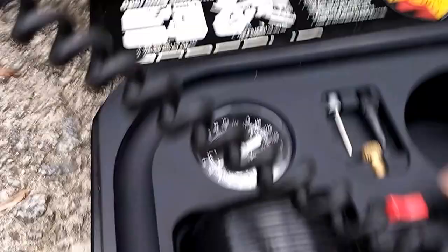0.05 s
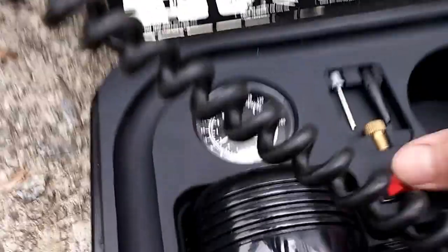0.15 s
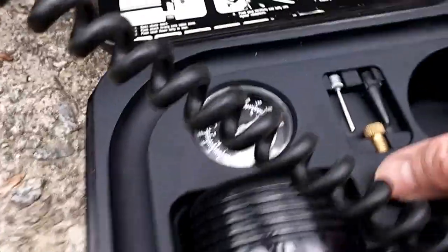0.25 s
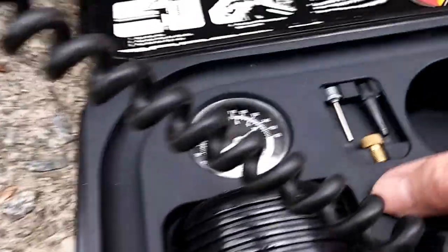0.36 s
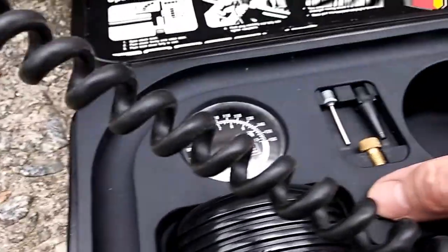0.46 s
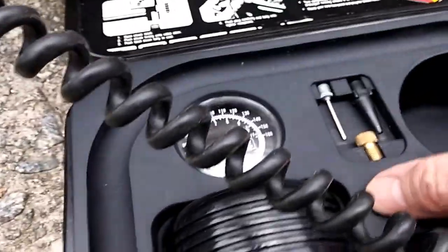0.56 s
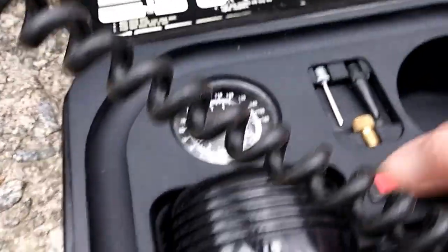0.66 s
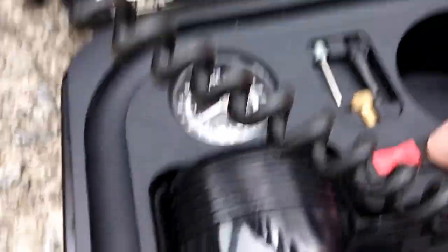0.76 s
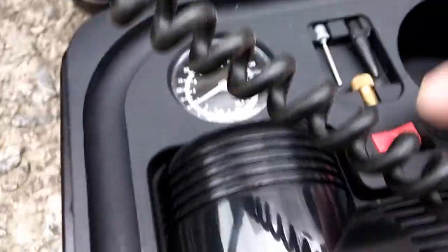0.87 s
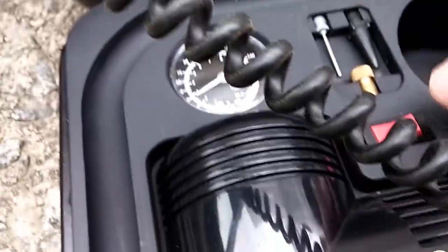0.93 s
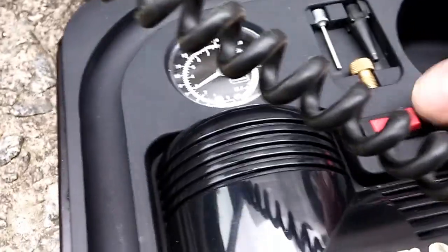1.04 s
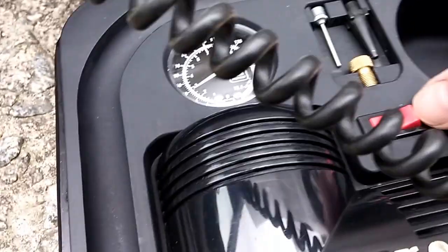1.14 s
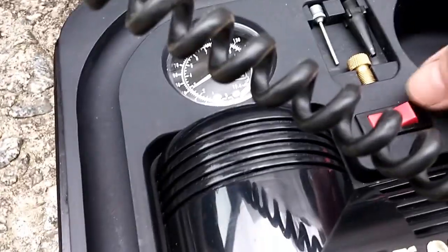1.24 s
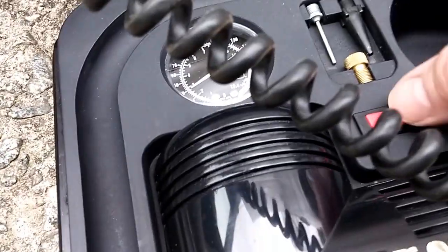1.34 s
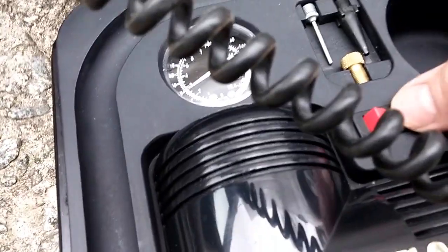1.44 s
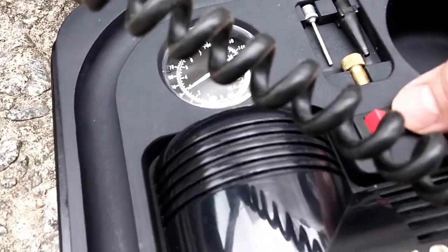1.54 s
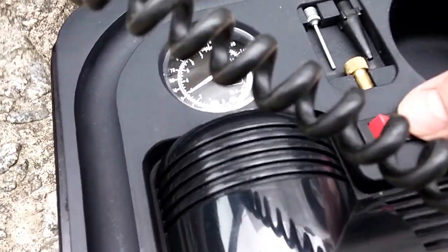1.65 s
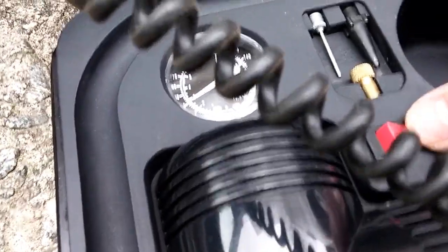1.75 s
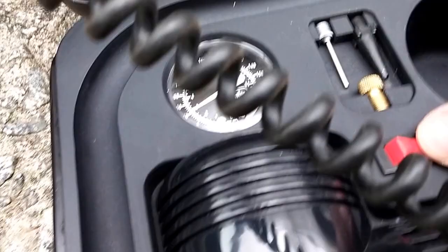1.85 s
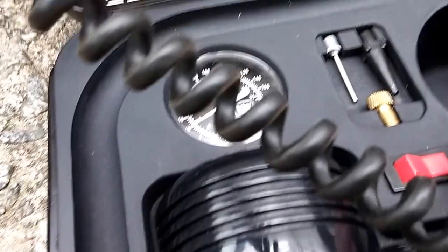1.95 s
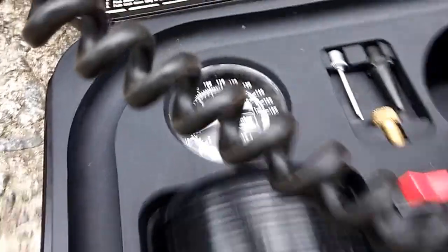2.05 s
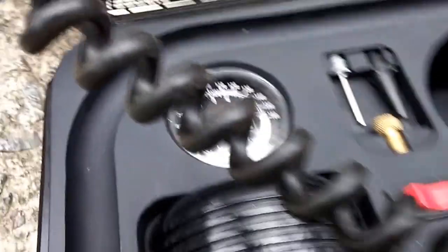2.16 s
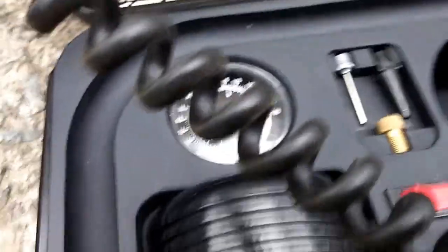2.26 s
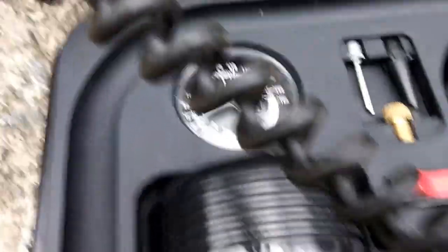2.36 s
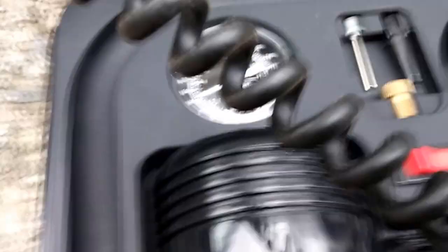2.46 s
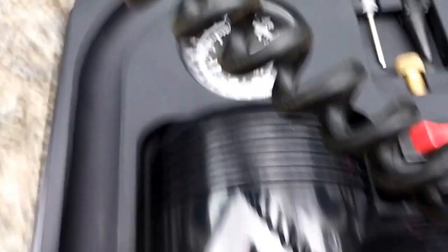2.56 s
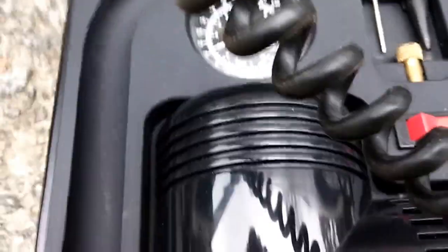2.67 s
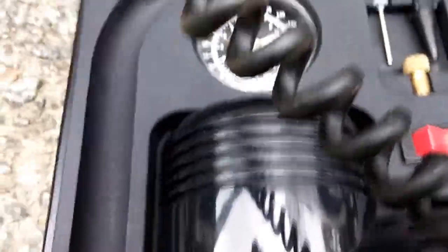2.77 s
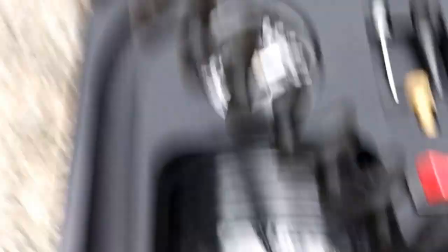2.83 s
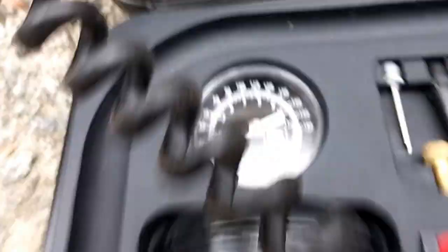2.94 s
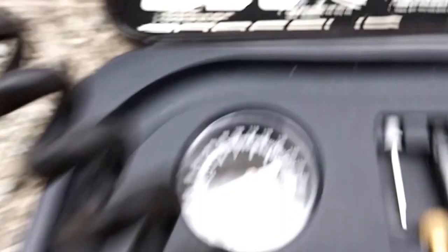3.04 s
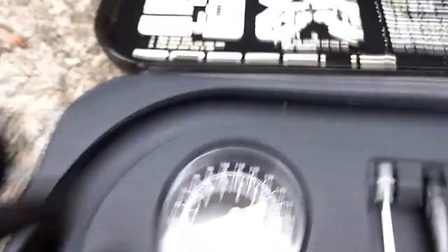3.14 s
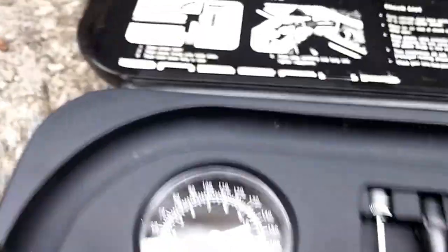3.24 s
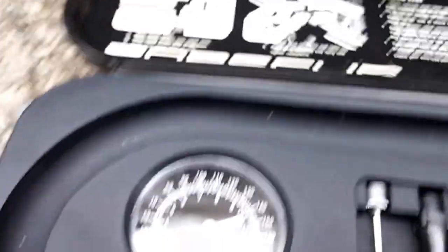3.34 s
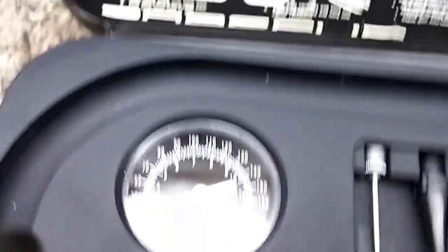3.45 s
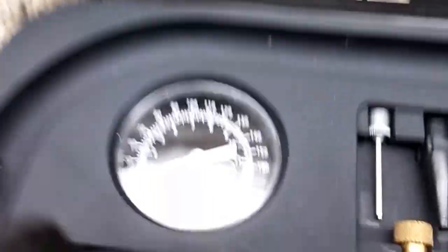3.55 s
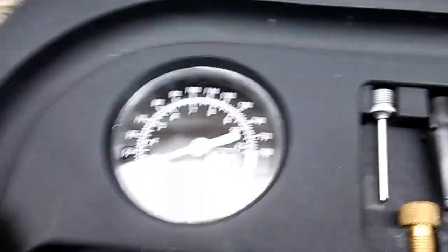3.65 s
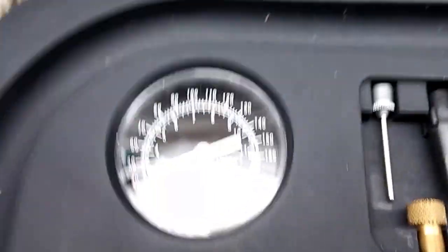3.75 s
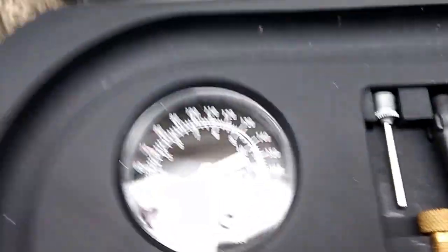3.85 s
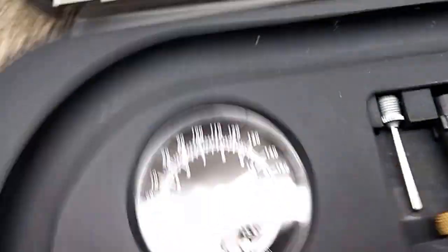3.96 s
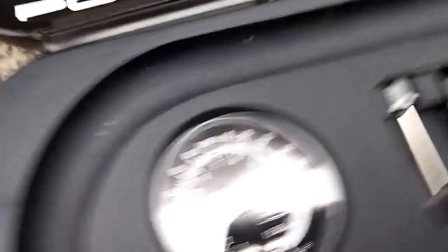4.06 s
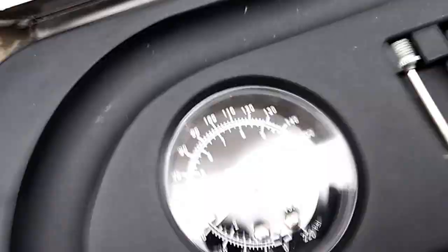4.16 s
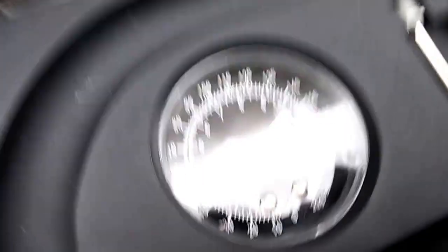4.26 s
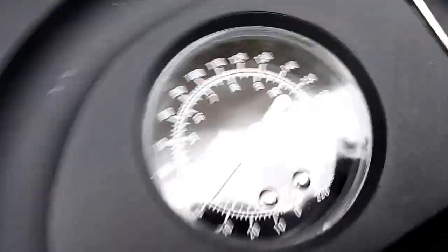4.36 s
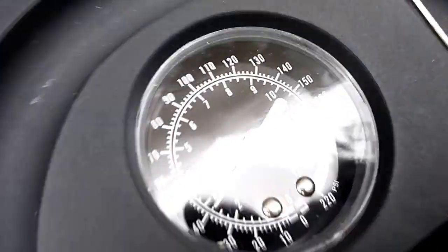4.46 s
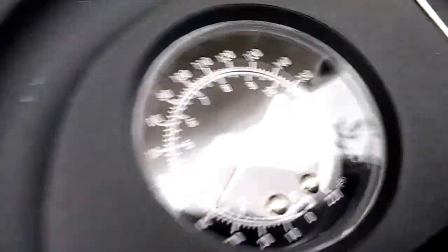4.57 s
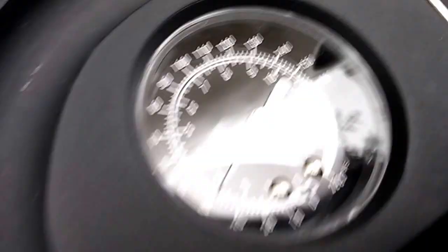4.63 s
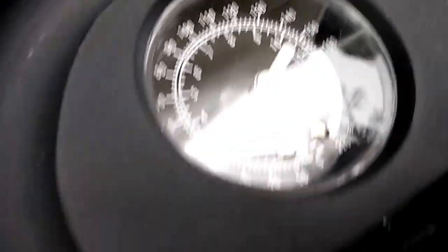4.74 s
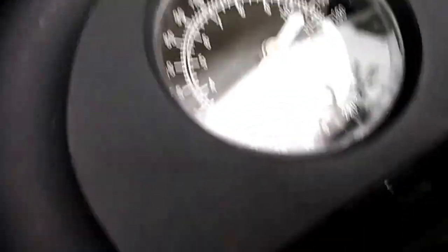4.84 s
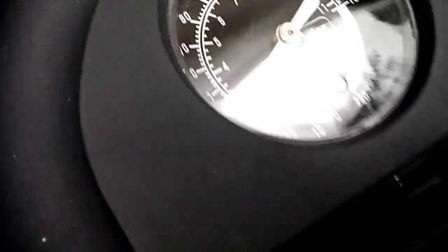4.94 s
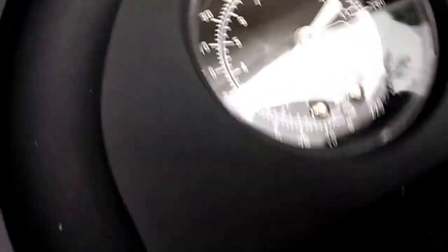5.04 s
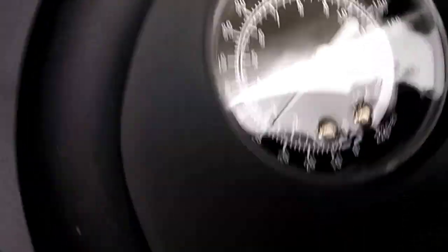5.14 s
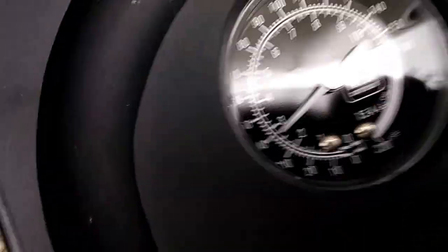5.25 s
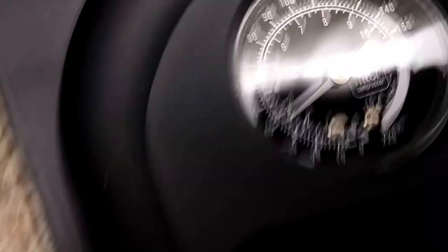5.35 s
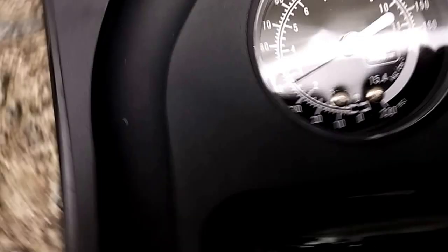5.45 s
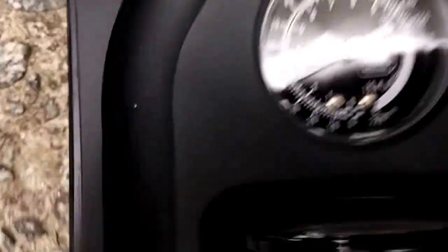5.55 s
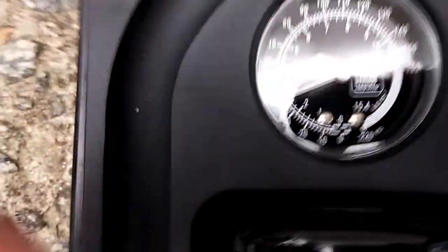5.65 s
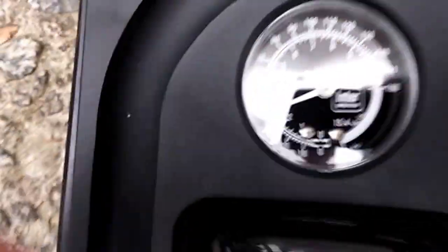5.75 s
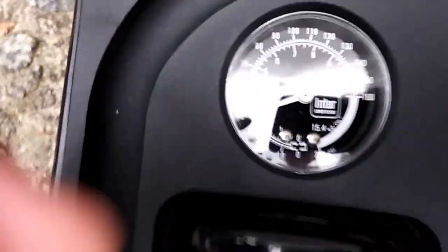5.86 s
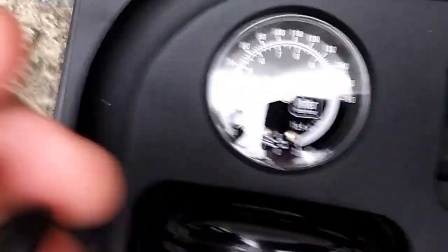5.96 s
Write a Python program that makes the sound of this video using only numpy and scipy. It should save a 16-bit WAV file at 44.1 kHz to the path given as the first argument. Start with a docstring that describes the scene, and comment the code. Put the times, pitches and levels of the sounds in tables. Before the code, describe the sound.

Plastic clicks and knocks on a small case, then a switch snaps and a piston air compressor bursts into a steady buzzing drone.

```python
"""A hand brushes and knocks the plastic case and hose of a small air compressor, then snaps its rocker switch.
The piston motor spins up at once and sags as pressure builds: each crank turn drones, rattles the case,
spits air through the outlet valve and pings the inlet reed, while the motor housing whines.
It stands on the ground outdoors, close to a hand-held camera's stereo microphones, over a faint background.
Random patterns tied to the crank angle, and noise, excite resonances and spectra; one crank drives the machine."""
import sys
import numpy as np
from scipy import signal
from scipy.fft import rfft, irfft, next_fast_len
from scipy.io import wavfile
from scipy.ndimage import uniform_filter1d, map_coordinates

SR = 44100
rng = np.random.default_rng(int(sys.argv[2]) if len(sys.argv) > 2 else 0)


def generate_wav(signal):
    """Clip the signal to [-1, 1] and save it as 16-bit WAV at the path in sys.argv[1]."""
    frames = np.transpose(np.atleast_2d(signal))
    scaled = np.clip(frames, -1, 1) * 32767
    pcm = np.round(scaled).astype(np.int16)
    wavfile.write(sys.argv[1], SR, pcm)


N = 264600

# Motor start and sag. Each row: time in seconds, speed in crank turns per second.
CRANK_SPEED = [(1.47, 0), (1.55, 31.22), (1.7, 34.051), (1.8, 33.814), (2, 33.005), (2.3, 32.252),
               (2.8, 31.693), (3.4, 31.381), (4, 31.189), (4.6, 31.074), (5.3, 30.906), (6, 30.598)]
# The throb grows as the camera comes closer. Each row: time in seconds, relative throb level in dB.
CAMERA_CLOSENESS = [(1.6, -27), (2.14, -25.5), (2.38, -26), (3.38, -21), (4.74, -17), (5.96, -20.5),
                    (6.0, -20.5)]
# Levels as the camera drifts aside. Each: level at the start in dB before closeness, loss in dB per second.
DRONE_FADE = (-11, 0.49)
RATTLE_FADE = (-19.5, 2.03)
AIR_FADE = (-21, 1.0)
# The motor housing's whine near 1.7 kHz. Each row: time in seconds, relative level in dB.
WHINE_LEVEL = [(1.6, -28), (1.96, -29), (2.16, -24.5), (3.2, -26.5), (3.26, -33), (3.93, -29),
               (5.44, -29.5), (5.6, -25), (5.9, -27)]
# The inlet reed's ping near 3 kHz. Each row: time in seconds, relative level in dB.
PING_LEVEL = [(1.6, -31.5), (2.09, -33.5), (2.43, -25.5), (3.85, -32.5), (4.13, -29), (4.33, -43),
              (5.02, -29), (5.48, -37), (5.9, -45)]
# A jolt of the case, heard as extra rattle. Columns: centre in seconds, length in seconds, relative level in dB.
CASE_JOLT = (1.7, 0.014, -28)
# Stereo tilt of the machine. Each row: frequency in Hz, left minus right in dB.
MICROPHONE_FACING = [(60, -1.5), (700, -0.5), (2400, -0.5), (4400, -2.5), (8200, -8), (11000, -6.5),
                     (15000, 1.5)]
CATCH_S, SWELL_S = 1.496, 0.026  # the pump catches, then swells with this time constant
CLOSE_SHARE = 0.42  # share of the throb's level change that the drone, rattle and air follow
# left minus right at the start, its drift to the right, and the share the drone follows
PAN_DB, PAN_DB_PER_S, DRONE_PAN_SHARE = 2, 1.3, 0.63


def compressor():
    """One crank drives every part of the running sound; the camera comes closer and drifts aside."""
    speed, = curves(CRANK_SPEED)
    turn = np.cumsum(speed) / SR
    load = pressure()
    age = np.maximum(np.arange(N) / SR - CATCH_S, 0)
    running = 1 - np.exp(-age / SWELL_S)

    throb_db, = curves(CAMERA_CLOSENESS)
    whine_db, = curves(WHINE_LEVEL)
    ping_db, = curves(PING_LEVEL)
    near_db = CLOSE_SHARE * (throb_db - throb_db.max())
    drone_db, rattle_db, air_db = (start_db + near_db - loss * age
                                   for start_db, loss in (DRONE_FADE, RATTLE_FADE, AIR_FADE))
    sides = np.array([[.5], [-.5]])  # half of each difference to the left, half to the right
    pan_db = (PAN_DB - PAN_DB_PER_S * age) * sides

    low = running * drone(turn, speed, load, throb_db + 1.06, drone_db)
    low = ears(low) * amp(DRONE_PAN_SHARE * pan_db)
    case = (running * amp(rattle_db) + swells([CASE_JOLT])) * rattle(turn)
    ringing = amp(whine_db - 2.14) * whine(turn) + amp(ping_db - 0.2) * reed(turn)
    hiss = uneven_tone(amp(air_db) * air(turn, load), depth_db=3.0)
    high = ears(case + running * (ringing + hiss)) * amp(pan_db)
    return filtered(low + high, lambda hz: amp(along(MICROPHONE_FACING, hz) * sides))


# back pressure (0-1) stays at its idle value until the hose starts to fill; then its time constant
IDLE_LOAD, FILL_FROM_S, FILL_TIME_S = 0.092, 1.95, 0.5


def pressure():
    """Back pressure 0-1: the hose fills quickly at first, then ever more slowly."""
    filling = np.maximum(np.arange(N) / SR - FILL_FROM_S, 0)
    return np.clip(1 - (1 - IDLE_LOAD) * np.exp(-filling / FILL_TIME_S), 0, 1)


# Crank orders of the pump running free. Each row: multiple of crank speed, relative level in dB.
FREE_ORDERS = [(1, -29), (2, -2), (3, -4), (4, 2.5), (5, 3.5), (6, 9), (7, -1), (8, 5.5), (9, -2.5),
               (10, -84), (11, -30), (12, -1), (13, 3), (14, -2.5), (15, 3.5), (16, -34), (17, 0.5),
               (18, 1.5), (19, -23), (20, 4), (21, -24.5), (22, -7.5), (23, -11), (24, 2), (25, 0),
               (26, -32), (27, -11), (28, -3), (29, -46), (30, -15)]
# Crank orders of the pump under pressure. Each row: multiple of crank speed, relative level in dB.
LOADED_ORDERS = [(1, -28.5), (2, -10.5), (3, -4), (4, -2.5), (5, -7), (6, -3.5), (7, -9.5), (8, -24.5),
                 (9, -11), (10, -5), (11, -8.5), (12, -13), (13, -8.5), (14, 1.5), (15, -31), (16, -10),
                 (17, -12), (18, -11.5), (19, -10), (20, -20), (21, -15.5), (22, -16.5), (23, -2),
                 (24, -22), (25, -11.5), (26, -14.5), (27, -7.5), (28, -8.5), (29, -19), (30, -7),
                 (31, -16), (32, -16)]
# Inlet tract resonance, honking once a turn, most at half pressure.
# Columns: centre in Hz, width in Hz, relative level in dB, moment in turns.
INLET_TRACT = (445, 55, -1, .71)
# Tone of the rough mechanism. Each row: frequency in Hz, relative level in dB.
CHURN_TONE = [(25, -11.5), (45, 0), (130, 6.5), (430, 6), (600, 9), (880, 9), (1100, -28), (1600, -40)]
GEAR_CYCLE = 3  # crank turns until the gear train repeats


def drone(turn, speed, load, throb_db, drone_db, waver_db=1.5, count=4, size=4096):
    """Crank orders: the lowest are an even pumping throb, the rest gather around the piston's knock."""
    u = np.arange(size) / size
    knock = rng.standard_normal((2, size)) * np.exp(-((u - .57) % 1) / 1.7)
    phases = np.angle(rfft(knock))
    spot = (turn % 1 * size).astype(int) % size

    tract_hz, tract_width, tract_db, honk_at = INLET_TRACT
    half_loaded = np.abs(np.sin(np.pi * load)) ** 1.5
    typical_speed = np.average(speed, weights=half_loaded * speed)
    lines, power = np.zeros((2, 2, N)), np.zeros((2, N))  # throb first, then body; each mid and side
    for k, (_, loaded_db) in enumerate(LOADED_ORDERS, 1):
        free_db = FREE_ORDERS[min(k, len(FREE_ORDERS)) - 1][1]
        in_tract = np.exp(-((k * typical_speed - tract_hz) / tract_width) ** 2)
        honk = amp(tract_db) * in_tract * half_loaded
        gain = (1 - load) * amp(free_db) + load * amp(loaded_db) + honk
        gain = gain * amp(waver_db * wobble(3.16))
        if in_tract > 1 / 10:
            phases[0, k] = -2 * np.pi * k * honk_at  # these orders swell together as one burst
        if k <= count + 2:
            phases[0, k] = np.pi / 2 * k * k  # the case spreads the slow orders over the whole turn
        wave = np.cos(2 * np.pi * k * u + phases[:, k, None])
        part = int(k > count)
        lines[part] += gain * wave[:, spot]
        power[part] += gain ** 2 / 2
    throb, body = lines / np.sqrt(power[:, None])

    gears = chatter(turn / GEAR_CYCLE, repeat=0.26)  # the same gear teeth meet again every third turn
    push = 0.9 + stroke(turn, start=0.46, rise=0.02, fall=0.79, scatter_db=0.5)
    churn = coloured(gears * push, CHURN_TONE)
    settled = np.clip(speed / 32, 0, 1) ** 6  # the loose mechanism mostly clatters until it is up to speed
    rough = amp(-8.5 - 12 * load) + 0.69 * (1 - settled)
    tonal = amp(throb_db) * throb + amp(drone_db) * body
    return settled * tonal + amp(drone_db) * rough * churn


# Resonances of the plastic case. Each row: centre in Hz, width in Hz, relative level in dB.
CASE_MODES = [(1005, 43, 3.5), (1170, 47, 0.5), (1278, 63, -3.5), (1446, 49, 0), (1584, 51, 1.5),
              (1884, 130, -8)]


def rattle(turn):
    """The rod takes up its play twice a turn and shakes the case."""
    first = stroke(turn, start=0.097, rise=0.048, fall=0.15, scatter_db=3.0)
    second = stroke(turn, start=0.576, rise=0.056, fall=0.18, scatter_db=1.0)
    blows = 1.3 + first + 1.33 * second
    shaken = resonate(chatter(turn, repeat=0.93) * blows, CASE_MODES)
    return coloured(shaken, [(600, -26), (970, 1.5), (1850, -1.5), (2200, -4.0), (4000, -16.5)])


# Tone of the outlet spit. Each row: frequency in Hz, relative level in dB.
OUTLET_TONE = [(1500, -23), (2600, -6), (4000, -7.5), (5000, -3), (5800, -6.5), (7000, -4.5), (8000, 1.5),
               (9700, 0), (11000, -9), (12800, -16.5), (15500, -10.5)]
# Tone of the inlet suck. Each row: frequency in Hz, relative level in dB.
INLET_TONE = [(1500, -4), (2500, -3), (3500, -1.5), (4300, 7), (5200, -1.5), (5800, -3), (6600, 1.5),
              (9000, -17), (12800, -19.5), (15500, -21.5)]
# Tone of the motor brushes and gears. Each row: frequency in Hz, relative level in dB.
BRUSH_TONE = [(900, -16), (2000, -1.5), (3500, -0.5), (4700, -1), (5700, -5), (7500, -4), (9500, 1.5),
              (11300, -9), (12800, -11), (14200, -4.5), (16000, -16)]


def air(turn, load):
    """A sharp spit at the outlet valve and a softer suck at the inlet, over the hiss of brushes and gears."""
    spit = stroke(turn, start=0.055, rise=0.054, fall=0.076, scatter_db=0.95)
    spit = spit + 0.13 * stroke(turn, start=0.14, rise=0.054, fall=0.45, scatter_db=3.0)
    # a briefer gasp while the pump runs free
    suck = stroke(turn, start=0.715, rise=0.015, fall=0.23 + 0.12 * load, scatter_db=1.0)
    outlet = unit(coloured(chatter(turn, repeat=0.62), OUTLET_TONE) * spit)
    inlet = unit(coloured(chatter(turn, repeat=0.08), INLET_TONE) * suck)
    brushes = coloured(chatter(turn, repeat=0.66), BRUSH_TONE)
    return amp(-4.5 + 2.66 * load) * outlet + amp(-5 - 3.7 * load) * inlet + amp(-4.5) * brushes


# Resonances of the inlet reed. Each row: centre in Hz, width in Hz, relative level in dB.
REED_RESONANCES = [(3000, 79, 6.5), (3900, 62, -3.5), (5010, 110, -1)]
# Contacts of the reed in one crank turn. Each row: moment in turns, relative strength in dB.
REED_CONTACTS = [(.7, -3), (.1, -11)]


def reed(turn):
    """The inlet reed slaps open and rings, and is jarred again by the outlet stroke."""
    slaps = taps(turn, REED_CONTACTS, jitter=0.0011, scatter_db=1.0)
    rung = resonate(slaps + 0.011 * chatter(turn, repeat=0.71), REED_RESONANCES)
    return coloured(rung, [(1200, -23), (2600, 9), (5000, 2.0), (8000, -31)])


# Resonances of the motor housing. Each row: centre in Hz, width in Hz, relative level in dB.
HOUSING_MODES = [(1675, 67, -1.1), (1788, 173, 0.11)]
# Knocks of the rod in one crank turn. Each row: moment in turns, relative strength in dB.
ROD_CONTACTS = [(.66, 4.5), (0.1004, -4), (0.65, -12)]


def whine(turn):
    """The rod's knocks keep the motor housing ringing."""
    knocks = taps(turn, ROD_CONTACTS, jitter=0.0029, scatter_db=0.5)
    rung = resonate(knocks + 0.053 * chatter(turn, repeat=1.0), HOUSING_MODES)
    return coloured(rung, [(900, -20), (1600, 4.0), (1900, -5), (3000, -5)])


# Plastic clicks, knocks and thuds; the switch snaps at the last row.
# Each row: start in seconds, relative thump level in dB, softness from 0 (snap) to 1 (thud).
PLASTIC_CLICKS = [(.445, -33.5, .03), (.448, -24, 0.11), (0.465, -22, .35), (.522, -29, 0.74),
                  (0.828, -36.5, .24), (.847, -37, 0.34), (.988, -37, .76), (1.03, -45, .95),
                  (1.085, -44, .8), (1.174, -25, .5), (1.183, -34, .97), (1.22, -42, .97),
                  (1.438, -54, 0.69), (1.467, -36, 0.37), (1.472, -18.5, 0.036)]


def ring(levels_db, attack, t60, tail_db, tail_t60):
    """How strongly the clicks make a part vibrate: a quick decay with a faint longer tail, in seconds."""
    t = np.arange(SR // 3) / SR
    decay = amp(-60 * t / t60) + amp(tail_db - 60 * t / tail_t60)
    shape = (1 - np.exp(-t / attack)) * decay
    power = np.zeros(N)
    for (start, _, _), db in zip(PLASTIC_CLICKS, levels_db):
        power[round(start * SR):][:len(t)] += (amp(db) * shape) ** 2
    return np.sqrt(power)


# Tone of the surface crack. Each row: frequency in Hz, relative level in dB.
CRACK_TONE = [(1200, -11.5), (2700, -4.5), (5000, -3), (6500, 2), (8000, 3), (10000, -7), (13000, -13),
              (16000, -20.5)]
# Resonances of the case panel. Each row: centre in Hz, width in Hz, relative level in dB.
PANEL_MODES = [(446, 39, -2.5), (650, 76, -0.5), (935, 86, 1), (1245, 140, -0.5), (1400, 160, -5.5),
               (1910, 96, -6), (2550, 250, -15)]
# Tone of the hollow case. Each row: frequency in Hz, relative level in dB.
THUMP_TONE = [(50, -21.5), (120, -10), (175, 7), (300, -7), (450, -6), (900, -43)]
# Resonances of the metal fittings. Each row: centre in Hz, width in Hz, relative level in dB.
FITTING_MODES = [(3010, 99, 0), (9700, 300, -8)]
# crack and knock of a hard click over its thump, and what a soft one loses of each
CRACK_DB, CRACK_SOFT_LOSS_DB = 15.5, 51
KNOCK_DB, KNOCK_SOFT_LOSS_DB = 2.5, 15.5


def clicks():
    """Each click cracks at the surface, knocks the panel, thumps the hollow case and faintly rings metal."""
    _, thump_db, softness = np.transpose(PLASTIC_CLICKS)
    crack_db = thump_db + CRACK_DB - CRACK_SOFT_LOSS_DB * softness
    knock_db = thump_db + KNOCK_DB - KNOCK_SOFT_LOSS_DB * softness ** 3

    crack = ring(crack_db, attack=.0005, t60=.028, tail_db=-27, tail_t60=.17)
    crack = crack * uneven_tone(coloured(noise(), CRACK_TONE), depth_db=1.0)
    panel = coloured(resonate(noise(), PANEL_MODES), [(2800, 5.0), (7000, -18)])
    knock = ring(knock_db, attack=.0007, t60=0.061, tail_db=-23.5, tail_t60=0.34) * panel
    thump = ring(thump_db, attack=0.0034, t60=0.13, tail_db=-24.5, tail_t60=.25)
    thump = thump * coloured(noise(), THUMP_TONE)
    metal = ring(crack_db - 37, attack=.002, t60=0.27, tail_db=-12, tail_t60=.5)
    metal = metal * resonate(noise(), FITTING_MODES)
    return ears(crack + knock + thump + metal) * amp([[-.4], [.4]])  # slightly to the right


# Hand and hose sliding on the case. Each row: centre in seconds, length in seconds, relative level in dB.
SLIDES = [(0, 0.26, -49.5), (0.485, 0.047, -46), (.57, .12, -59), (.853, 0.034, -46), (0.902, 0.014, -56)]
# Tone of a slide. Each row: frequency in Hz, relative level in dB.
SLIDE_TONE = [(200, 4), (1150, -3), (1540, 11.5), (1850, -6), (2500, -7.5), (3300, -0.5), (4200, -7.5),
              (5500, -8.5), (7500, -16.5), (10000, -13.5), (16000, -23.5)]
# Fingertip scuffs. Each row: centre in seconds, length in seconds, relative level in dB.
FINGER_SCUFFS = [(.222, 0.021, -48.5), (.28, 0.04, -58), (.64, 0.031, -51.5)]
# Tone of a scuff. Each row: frequency in Hz, relative level in dB.
SCUFF_TONE = [(500, 5), (2500, -5), (4200, -8), (5200, 1.5), (6800, -9), (9300, -8), (12000, -18),
              (16000, -20)]


def handling():
    """Soft slides hiss and rumble on the plastic, and fingertips scuff it, with randomly uneven friction."""
    slide = swells(SLIDES)
    hiss = uneven_tone(coloured(noise(), SLIDE_TONE), depth_db=1.3)
    rub = slide * amp(1.6 * wobble(90)) * hiss
    scuff = swells(FINGER_SCUFFS) * amp(3 * wobble(150)) * coloured(noise(), SCUFF_TONE)
    return ears(rub + scuff + slide * rumble())


# Tone of the outdoor air and of the slides' rumble. Each row: frequency in Hz, relative level in dB.
RUMBLE_TONE = [(15, -37), (25, 4), (92, 0.5), (335, -20.5), (887, -21.5), (1700, -33.5), (2050, -31),
               (2410, -41), (2910, -35), (4030, -38), (16000, -49.5)]


def rumble():
    """Low noise, rolled off steeply below 55 Hz."""
    return filtered(coloured(noise(), RUMBLE_TONE), lambda hz: 1 / np.sqrt(1 + (55 / (hz + 1)) ** 8))


def outdoors():
    """The steady, quiet outdoor background."""
    return ears(amp(-57) * rumble())


# Stereo spread. Each row: frequency in Hz, side minus mid in dB.
STEREO_WIDTH = [(25, -8), (60, -21), (150, -20), (330, -14.5), (700, -6.5), (1000, 0.5), (1400, 5),
                (2400, -1.5), (16000, 1)]


def ears(pair):
    """Mid and side to left and right: the bass reaches both microphones nearly alike."""
    mid, side = filtered(pair, lambda hz: np.array([np.ones_like(hz), amp(along(STEREO_WIDTH, hz))]))
    return np.array([mid + side, mid - side])


def uneven_tone(pair, depth_db, order=5, count=9, size=1024):
    """Uneven tone colour: random spectral peaks and dips that drift slowly."""
    z = signal.stft(pair, nperseg=size)[2]
    field = uniform_filter1d(rng.standard_normal((z.shape[1], count + 1)), order, 0)
    field = signal.resample(field / field.std(), z.shape[2], axis=1)
    shaped = z * amp(depth_db * field - depth_db ** 2 / 9)
    return signal.istft(shaped, nperseg=size)[1][:, :N]


def chatter(turn, repeat, size=1400, count=9):
    """Roughness of which a share comes back with every crank turn, its pattern slowly changing."""
    patterns = rng.standard_normal((2, count + 1, size))
    age = np.arange(N) / N * count
    row, blend = age.astype(int), age % 1 * np.pi / 2
    spot = (turn % 1 * size).astype(int) % size
    locked = patterns[:, row, spot] * np.cos(blend) + patterns[:, row + 1, spot] * np.sin(blend)
    share = np.clip(repeat, 0, 1)
    return np.sqrt(share) * locked + np.sqrt(1 - share) * noise()


def stroke(turn, start, rise, fall, scatter_db, size=256):
    """A burst once a turn, each of its own strength around peak 1; start, rise and fall in turns."""
    number, u = np.divmod(turn - start, 1)
    shape = (1 - np.exp(-(u / rise) ** 2)) * np.exp(-u / fall)
    strength = amp(scatter_db * rng.standard_normal(size))
    return shape / shape.max() * strength[number.astype(int)]


def taps(turn, contacts, jitter, scatter_db):
    """One impulse per contact and turn, mid and side, each slightly off in time (turns) and strength."""
    out = np.zeros((2, N))
    number = np.arange(int(turn[-1]))
    for row in out:
        for start, db in contacts:
            late, strength = rng.standard_normal((2, len(number)))
            at = np.searchsorted(turn, number + start + jitter * late)
            row[np.minimum(at, N - 1)] += amp(db + scatter_db * strength)
    return out


def swells(rows):
    """A smooth rise and fall for each (centre s, length s, dB) row."""
    t = np.arange(N) / SR
    return sum(amp(db) * np.exp(-2 * ((t - s) / length) ** 2) for s, length, db in rows)


def amp(db):
    """Decibels to amplitude."""
    return 10 ** (np.asarray(db) / 20)


def unit(x):
    """Scale so that the first row has rms 1."""
    return x / np.sqrt(np.mean(np.atleast_2d(x)[0] ** 2) + 1e-20)


def along(points, hz):
    """(Hz, value) points on a log axis."""
    f, v = np.transpose(points)
    return np.interp(np.log(hz + 1), np.log(f + 1), v)


def curves(rows):
    """One value per sample for each column after the time."""
    s, *cols = np.transpose(rows)
    return [np.interp(np.arange(N) / SR, s, c) for c in cols]


def wobble(rate):
    """A smooth random curve, rate knots a second."""
    coarse = np.arange(0, N + 64, 64)
    knots = rng.standard_normal(int(N * rate / SR) + 4)
    smooth = map_coordinates(knots, [coarse * rate / SR], mode="nearest")
    return np.interp(np.arange(N), coarse, smooth)


def filtered(x, response):
    """x times a response of frequency."""
    m = next_fast_len(N + SR // 4)
    return irfft(rfft(x, m) * response(np.fft.rfftfreq(m, 1 / SR)), m)[..., :N]


def coloured(x, spectrum):
    """x shaped by a (Hz, dB) spectrum, with the first row at rms 1."""
    return unit(filtered(x, lambda hz: amp(along(spectrum, hz))))


def resonate(x, modes):
    """x through (Hz, width Hz, dB) resonances of alternating sign, with the first row at rms 1."""
    def response(f):
        total = 0
        for k, (centre, width, db) in enumerate(modes):
            damping = 1j * f * width
            total = total + (-1) ** k * amp(db) * damping / (centre ** 2 - f ** 2 + damping)
        return total
    return unit(filtered(x, response))


def noise():
    """White noise, mid and side."""
    return rng.standard_normal((2, N))


def scene():
    """The running machine, the plastic clicks, the hand's slides and the outdoor background."""
    return compressor() + clicks() + handling() + outdoors()


TOP_HZ = 15900  # the camera's band limit


def record(dry):
    """The camera rounds off the highest peaks and keeps almost nothing above its band limit."""
    rounded = dry / (1 + np.abs(dry) ** 8) ** (1 / 8)
    return filtered(rounded, lambda hz: 1 / np.sqrt(1 + (hz / TOP_HZ) ** 240))


dry = scene()
out = record(dry)
generate_wav(out)
```